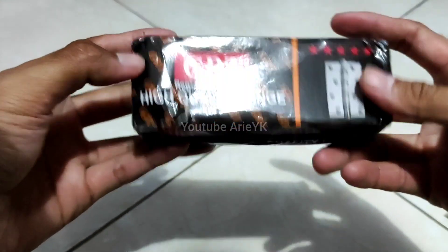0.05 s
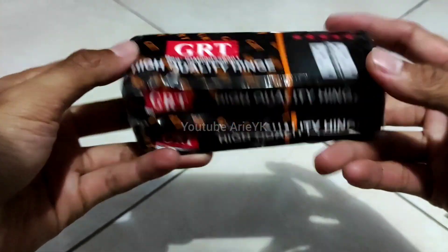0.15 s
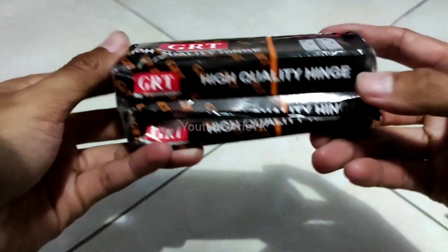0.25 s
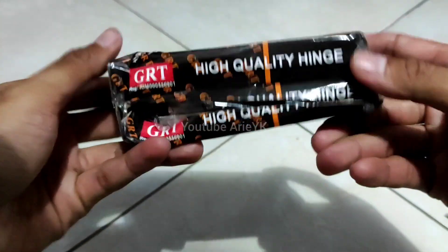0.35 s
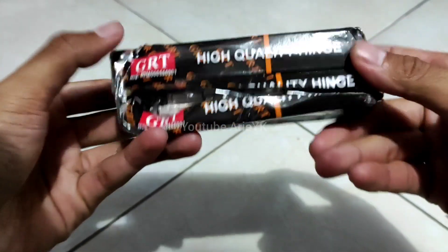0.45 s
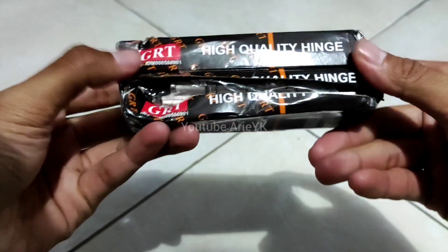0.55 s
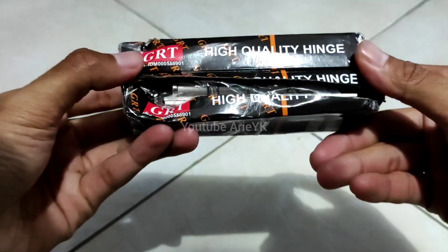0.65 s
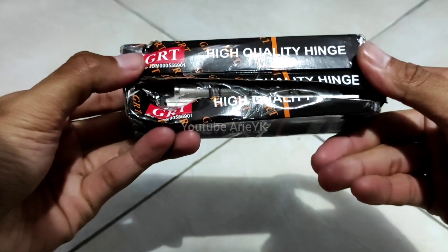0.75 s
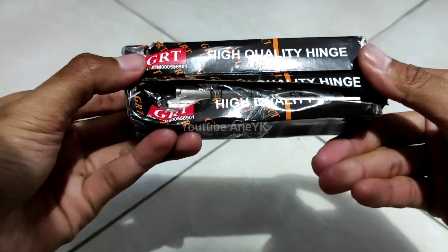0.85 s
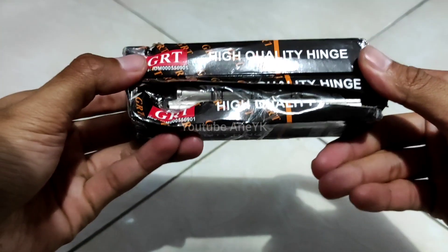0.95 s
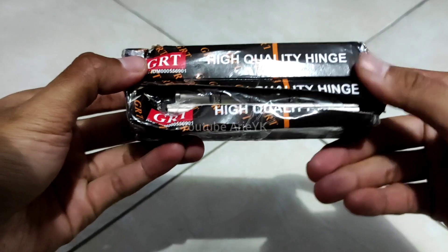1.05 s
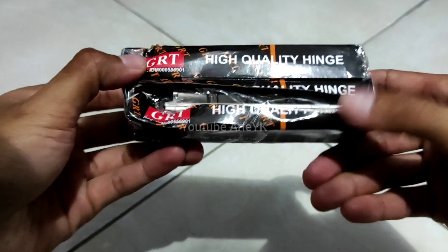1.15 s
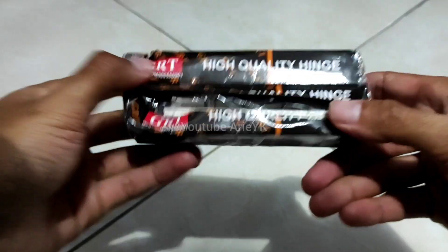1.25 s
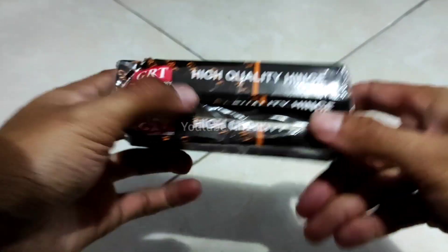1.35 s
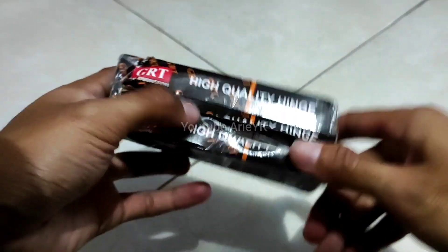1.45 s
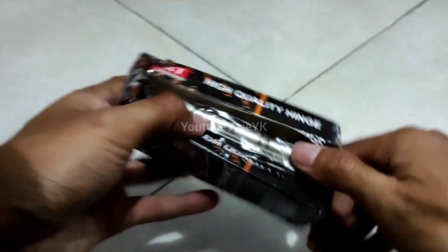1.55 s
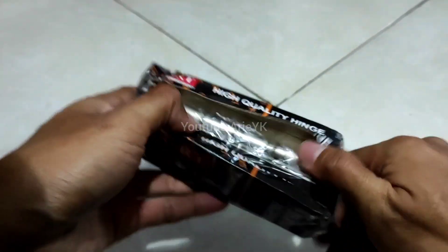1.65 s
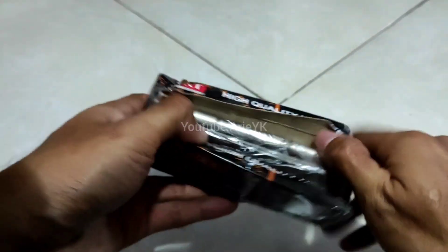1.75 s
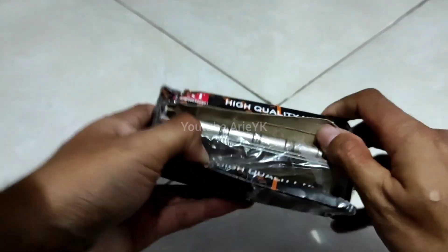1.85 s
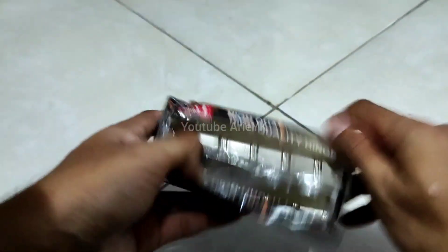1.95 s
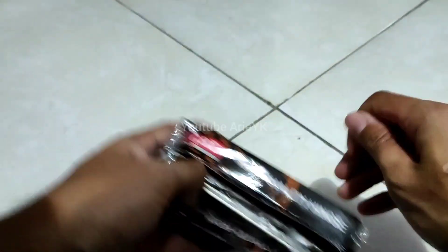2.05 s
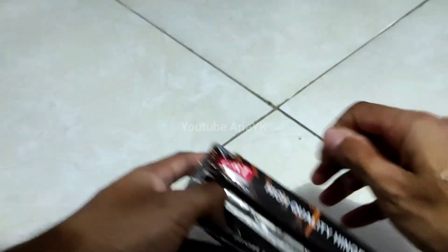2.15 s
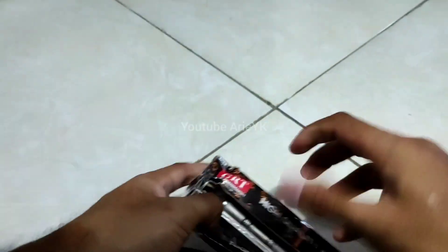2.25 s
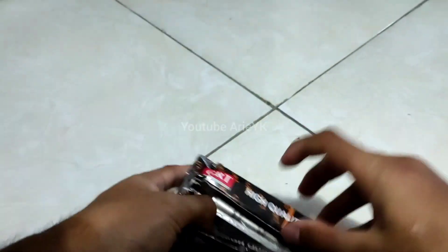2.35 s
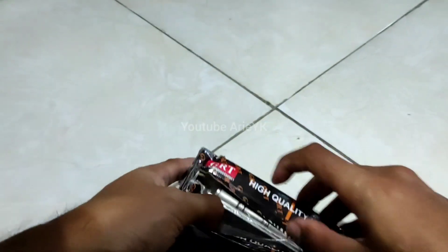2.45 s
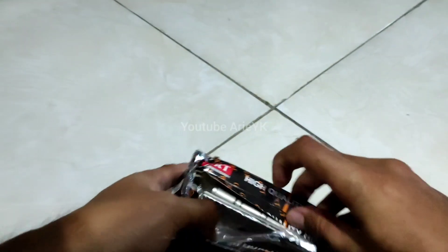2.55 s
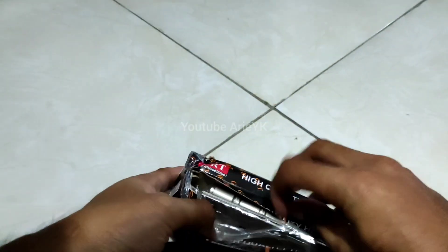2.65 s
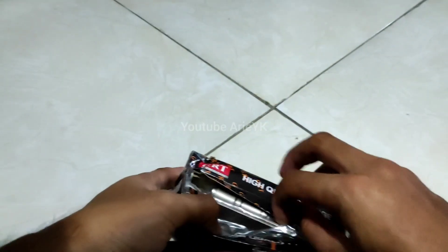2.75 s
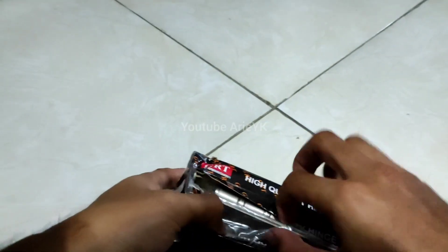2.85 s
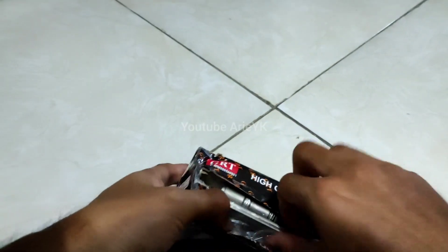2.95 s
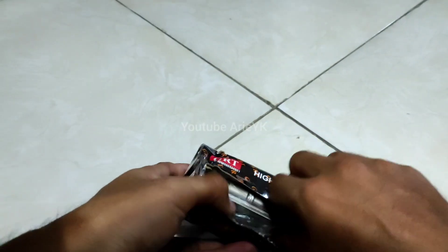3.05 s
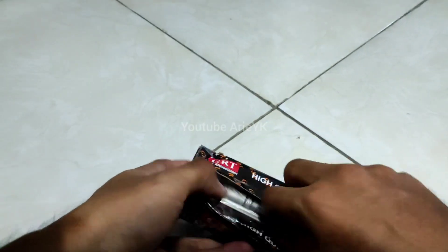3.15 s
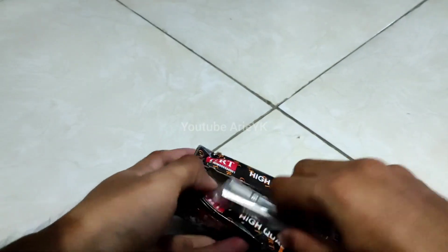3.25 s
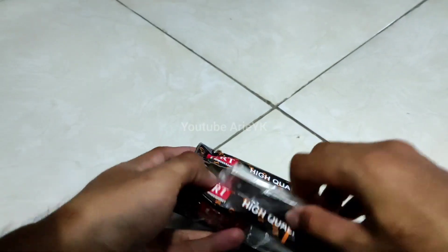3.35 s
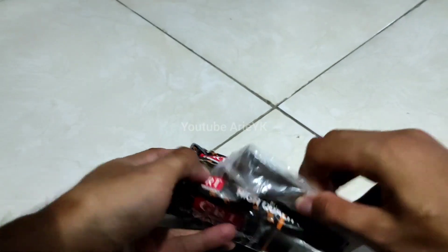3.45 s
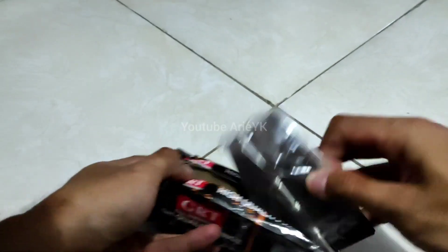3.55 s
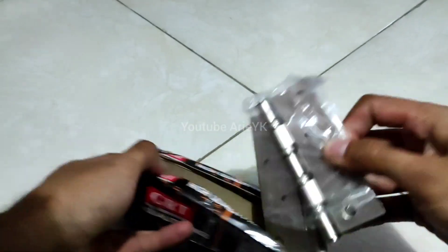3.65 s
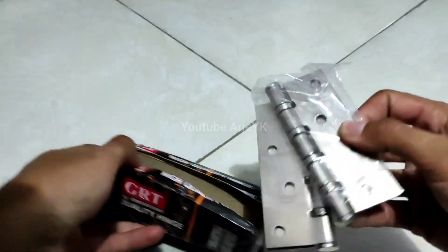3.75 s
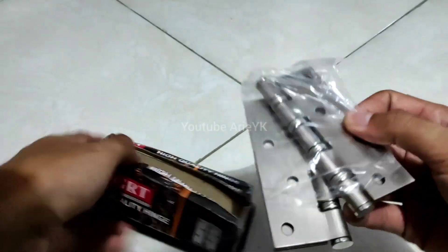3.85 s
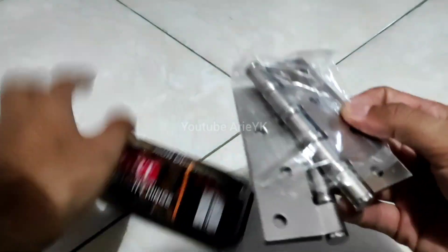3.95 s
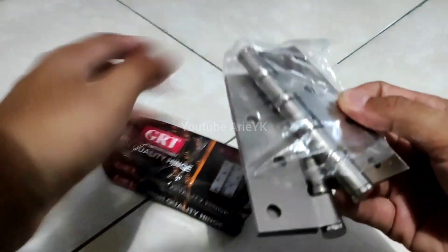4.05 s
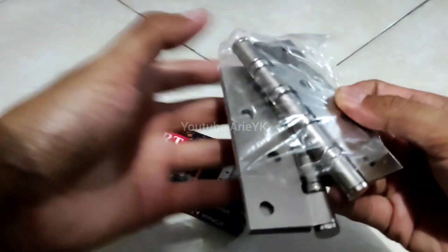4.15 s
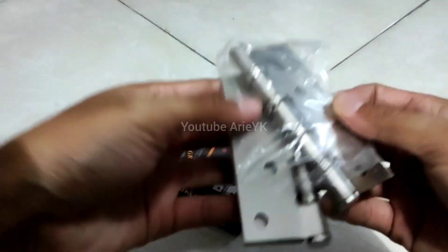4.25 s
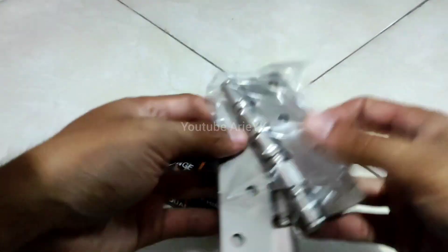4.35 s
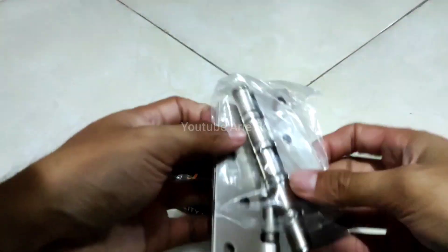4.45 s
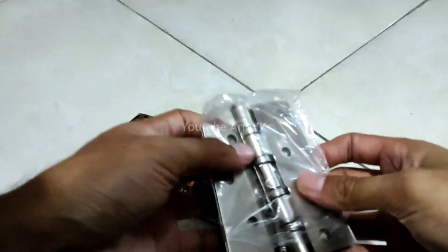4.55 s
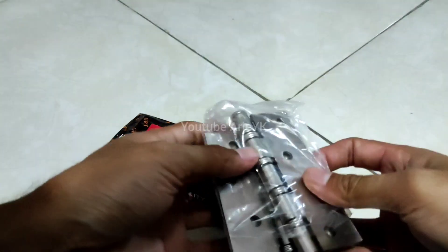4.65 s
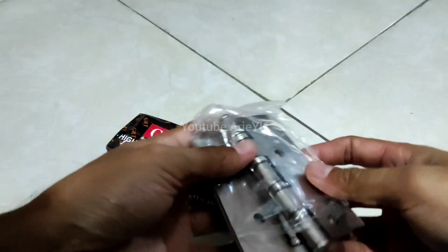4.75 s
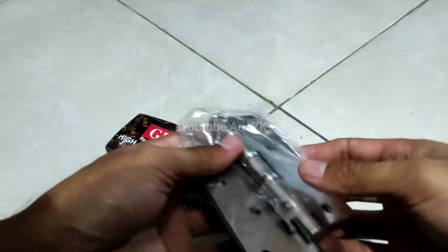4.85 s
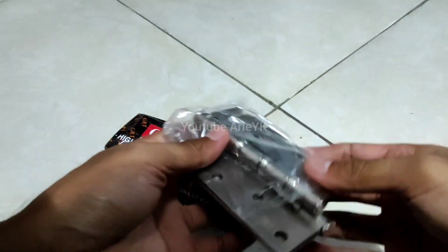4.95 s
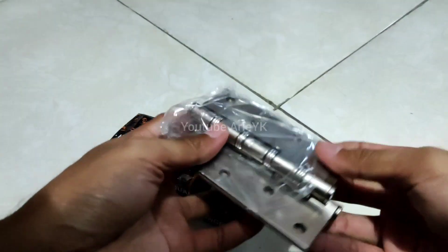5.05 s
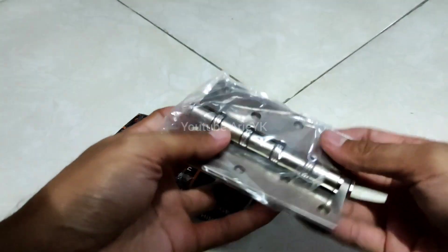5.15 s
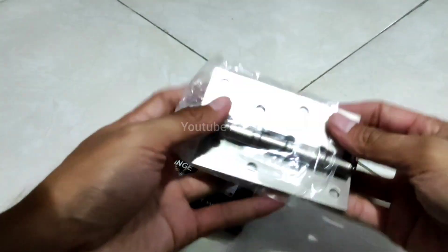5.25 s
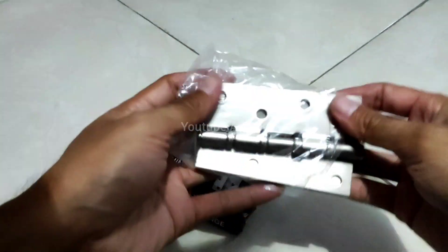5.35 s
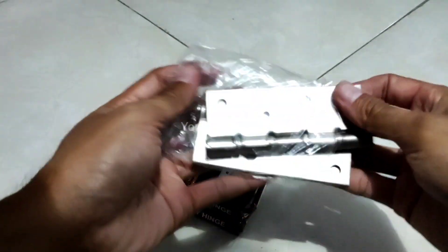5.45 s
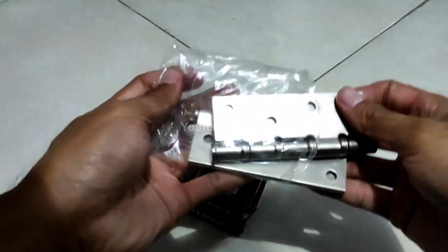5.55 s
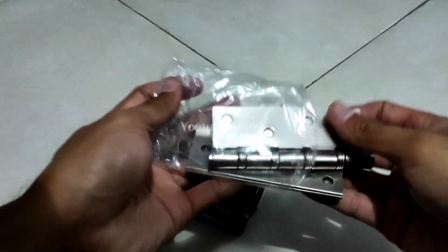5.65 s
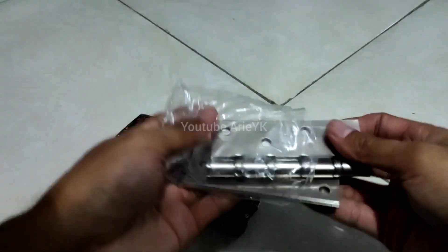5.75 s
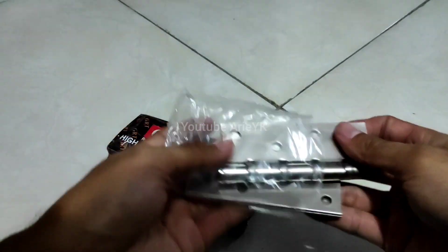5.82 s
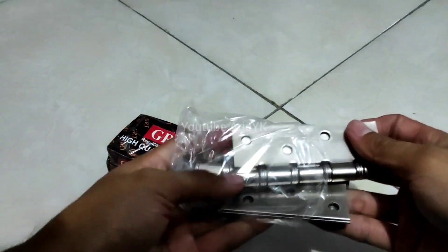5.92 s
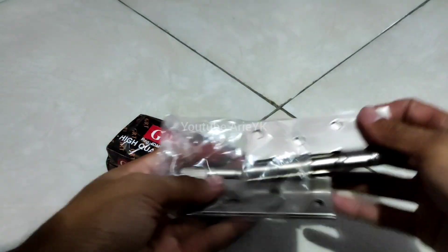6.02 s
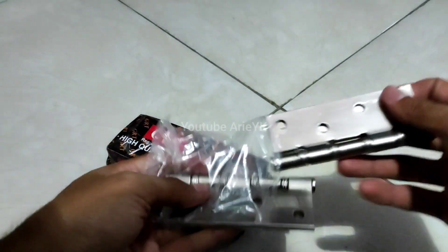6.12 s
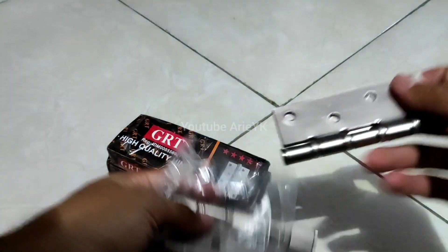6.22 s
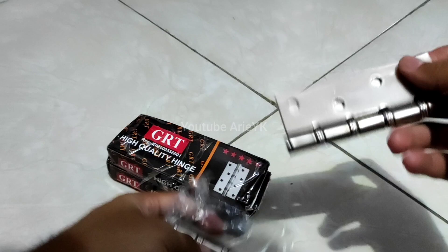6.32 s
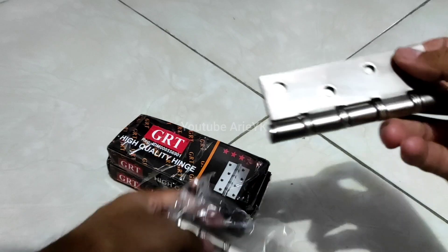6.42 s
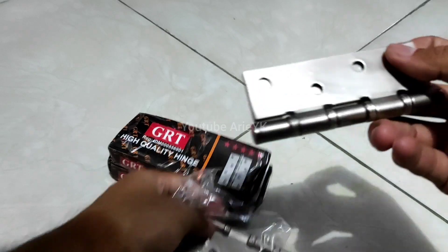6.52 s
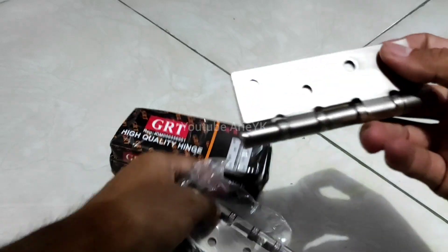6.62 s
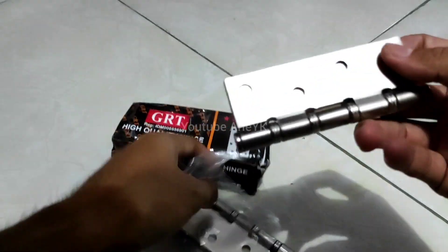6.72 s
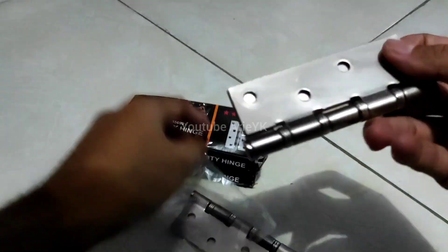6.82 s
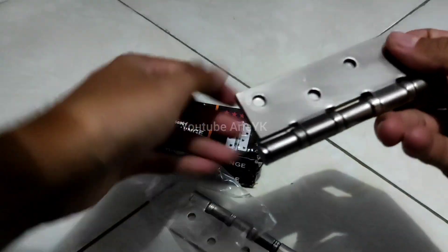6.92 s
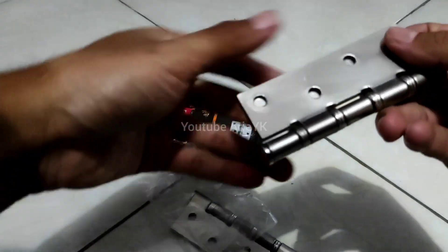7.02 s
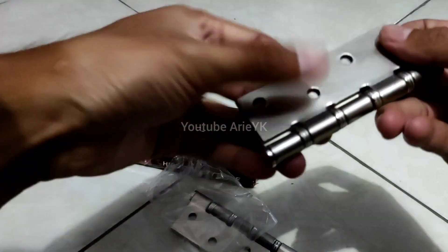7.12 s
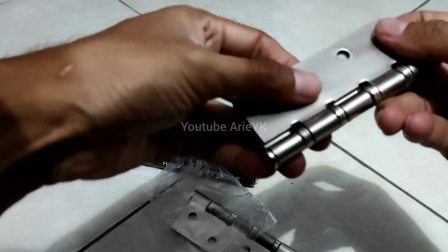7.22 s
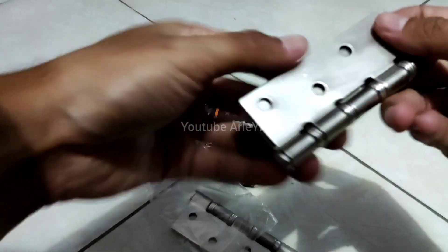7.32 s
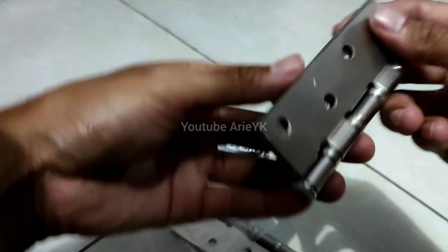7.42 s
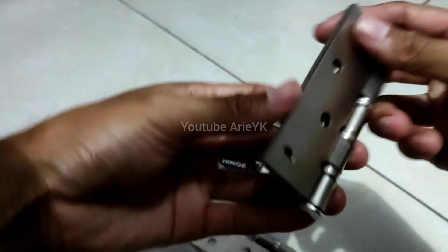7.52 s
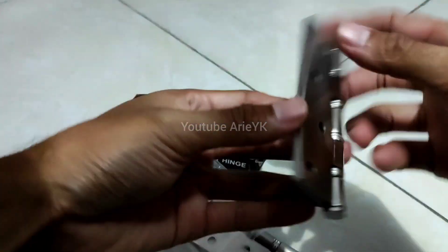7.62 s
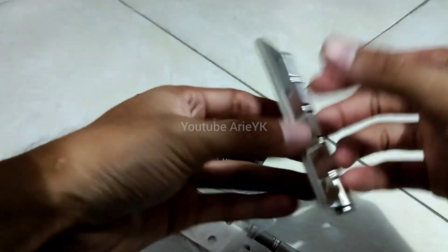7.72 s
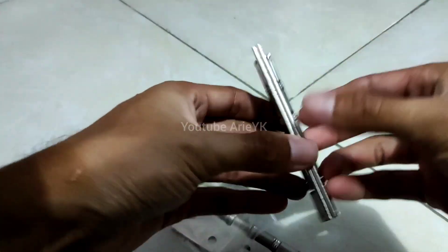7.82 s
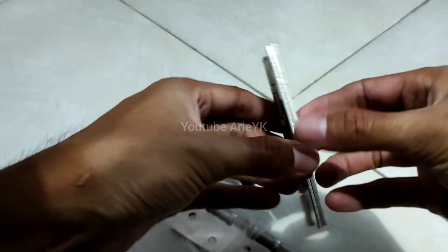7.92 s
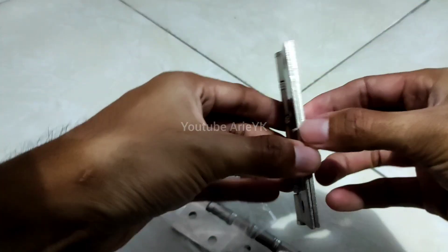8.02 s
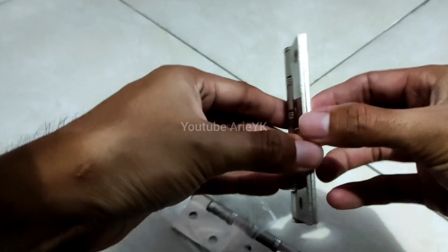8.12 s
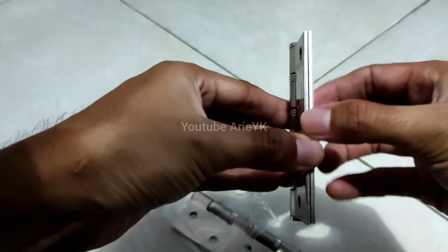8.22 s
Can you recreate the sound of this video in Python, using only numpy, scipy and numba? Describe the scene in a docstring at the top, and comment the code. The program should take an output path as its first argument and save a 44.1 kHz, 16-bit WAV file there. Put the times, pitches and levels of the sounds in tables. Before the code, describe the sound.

Close to a phone microphone in a small tiled room, hands work stiff plastic film. A few light clicks and rustles come first, then dense bright crackling with sharp snaps and dull box knocks, loudest past the middle. The film is put down and the crackle stops; soft finger sliding remains, with three brief, thin, high metallic rings from a turning hinge. Faint low hum, hiss and a steady high insect drone lie underneath.

```python
"""In a small tiled room, hands unwrap a steel hinge from crisp plastic film close to a phone.
Creases snap and rustle as shaped noise bursts; fingers swish and slide as grainy noise; dull knocks and thin
gliding squeaks sit among them, then three turns of the hinge ring as wavering sine modes.
Outside, filtered noise makes hum, hiss and an insect drone, and gliding tones make far engines.
The two microphone ports colour the film differently: the right one resonates near 6 kHz."""
import sys
import numpy as np
from scipy import signal
from scipy.fft import rfft, irfft, next_fast_len
from scipy.io import wavfile
from scipy.ndimage import uniform_filter1d
from numba import njit

SR = 44100
rng = np.random.default_rng(int(sys.argv[2]) if len(sys.argv) > 2 else 0)


def wav_record(signal):
    """Record a signal, one row per channel, as 16-bit PCM in the file named by sys.argv[1]."""
    frames = np.transpose(np.atleast_2d(signal))
    bounded = np.clip(frames, -1, 1)
    # unit amplitude maps onto the largest positive 16-bit level
    quanta = np.round(bounded * 32767).astype(np.int16)
    wavfile.write(sys.argv[1], SR, quanta)


N = 365059

# Levels in the tables are relative: each source is balanced again where it is played.
# Outdoor hum and hiss spectrum: f/Hz, left level/dB per Hz, right level/dB per Hz, likeness of the sides (0-1)
OUTDOOR_SPECTRUM = [(25, -85, -90.5, 0.6), (70, -83.5, -88.5, 0.3), (118, -87.5, -90, 0.6),
                    (167, -82, -88.5, 1), (265, -89.5, -98.5, 0.8), (332, -93.5, -95, 0.12),
                    (530, -101, -104, 0.9), (660, -101, -104, 0.4), (1030, -112, -113, 0.3),
                    (2000, -114, -114, 0.05), (3500, -113, -113, 0), (6000, -120, -103, 0.4),
                    (7840, -117, -115, 0), (12800, -130, -128, 0), (15000, -150, -150, 0.06)]
# Wavering low tones: f/Hz, width/Hz, level/dB
HUM_TONES = [(75.3, 8.9, -73), (168.6, 22.7, -69), (239, 66, -69.5)]
# Swell of the low hum: t/s, level/dB
TRAFFIC_SWELL = [(0, 2), (1, 2.5), (2.3, 6), (3.2, -1), (4.5, 3), (5.5, 3), (6.5, 3.5), (7.4, -1),
                 (7.7, -7.5), (8.28, -8)]
# Far engines: start t/s, end t/s, start f/Hz, end f/Hz, level/dB
ENGINE_GLIDES = [(0, 1.5, 201, 197, -73), (1.5, 2.8, 162, 166, -68), (4.0, 5.9, 137, 133, -74),
                 (4.25, 4.7, 170, 180, -68), (4.7, 6.0, 243, 240, -74), (5.9, 6.8, 249, 248, -68),
                 (6.9, 7.2, 195, 197, -69), (7.2, 7.5, 167, 166, -70), (7.95, 8.1, 357, 360, -75)]
# Swell of the insect drone: t/s, level/dB
INSECT_DRONE_SWELL = [(0, 0), (.9, 0), (1.3, -3), (2, 0), (7, -3), (7.35, -3), (7.5, 1), (7.9, -1.5),
                      (8.28, 1)]
# How hard the hands work the film: t/s, effort level/dB, breadth/dB (mids against that level)
HAND_EFFORT = [(0, -68, -0.5), (.1, -71.5, -0.5), (.44, -48.5, -11), (.87, -64, -15.5), (1.01, -43, -21.5),
               (1.2, -57, -11.5), (1.23, -62, -5), (1.27, -62, 0), (1.31, -62, 1), (1.36, -59, 0.5),
               (1.42, -63.5, 1.5), (1.46, -58.5, 1.5), (1.5, -60, 1.5), (1.6, -49, 1.5), (1.92, -53.5, 1),
               (2.04, -34.5, -4.5), (2.17, -55, 1), (2.27, -74.5, 12), (2.33, -71, 11), (2.36, -55, -0.5),
               (2.53, -52, -3.5), (2.65, -43, -1.5), (2.72, -55, -8), (2.86, -59, 3.5), (2.9, -52.5, 4.5),
               (2.94, -54, -7.5), (3.02, -49.5, 0.5), (3.16, -54.5, 0), (3.27, -39, -3), (3.6, -37.5, -5),
               (3.74, -47, -1.5), (3.92, -63.5, 6), (3.97, -35, -6), (4.02, -47.5, -9), (4.07, -54.5, 2),
               (4.1, -47, 10.5), (4.21, -47.5, -12.5), (4.35, -44, 1.5), (4.49, -47.5, 1),
               (4.61, -32.5, -6.5), (4.68, -55.5, -1), (4.73, -39, -11), (4.78, -50.5, -11.5),
               (4.85, -37, -3), (5.0, -39, -16), (5.07, -44.5, -1.5), (5.13, -51, -8), (5.22, -43.5, -5.5),
               (5.5, -29.5, -10.5), (5.64, -50, 2.5), (5.69, -59.5, -1.5), (5.71, -46, 0.5),
               (5.78, -47, -3.5), (5.95, -37.5, -7.5), (6.23, -34, -7.5), (6.28, -50, -5.5),
               (6.35, -70, 9.5), (6.41, -29, -15.5), (6.5, -46.5, -2.5), (6.66, -56.5, 1), (6.8, -46, 2.5),
               (6.93, -51.5, 0.5), (7.03, -57.5, -18.5), (7.18, -57, -16.5), (7.24, -50.5, -19),
               (7.38, -50, -14.5), (7.64, -68, -17.5), (7.7, -50, -12), (7.86, -49.5, -15.5),
               (8.12, -73.5, -9.5), (8.23, -89.5, -2), (8.28, -58, 9.5)]
# Loud creases: t/s, crack level/dB, film level/dB, film f/Hz, thud level/dB, left minus right/dB, basic fade/ms
LOUD_SNAPS = [(0.2012, -53, -55.5, 1320, -63, -6, 6), (0.3494, -43, -49.5, 1190, -48, -5, 4.7),
              (0.4284, -51, -69, 4500, -54, -6, 1.8), (0.5, -40, -49.5, 4550, -56, -3, 5.4),
              (1.241, -58, -68.5, 2000, -60, -3, 15), (1.4142, -41, -67, 4440, -72, 9, 3),
              (1.4406, -45, -57, 1440, -72, -8, 4.3), (1.484, -41, -51, 1690, -60, -1, 6.9),
              (1.544, -33, -40, 2430, -34.5, -7, 3.1), (1.5938, -29, -49, 3300, -53, 2, 4.5),
              (1.7074, -53, -41, 2640, -77, 6, 2.9), (1.729, -36.5, -42.5, 2450, -70, -14.5, 4.8),
              (1.805, -60, -43, 1790, -60, -5, 11), (1.8246, -46, -37, 2540, -53, 6, 3.9),
              (1.8681, -31, -33, 2000, -37, -1, 3.9), (1.8965, -39, -37.5, 1600, -39.5, -5, 4.1),
              (1.914, -28.5, -43, 2500, -65, -3, 3), (1.966, -49, -38, 2670, -45, -4, 3.8),
              (1.981, -33, -42, 2400, -60, -6, 2.5), (1.9895, -16, -35.5, 2370, -47, 6.5, 3.8),
              (2.0422, -12.5, -27, 1440, -28.5, -3, 2.2), (2.0452, -19, -29, 2480, -31, 4, 1.5),
              (2.083, -19.5, -32, 1430, -43, -3, 4.5), (2.132, -58, -52, 1300, -39, -4, 1.9),
              (2.191, -46, -59, 3130, -41.5, -12, 3.5), (2.341, -54, -53, 1300, -35, -12, 4.7),
              (2.36, -27, -44, 3260, -52, -2, 11), (2.463, -38, -54, 2850, -56, -13, 3),
              (2.4733, -32, -53, 2920, -51, -10, 12.6), (2.513, -34, -40.5, 1720, -45.5, -7, 3.1),
              (2.571, -36, -37, 3350, -53, -2, 4.1), (2.5907, -47, -53, 3290, -51, -5, 3.8),
              (2.6223, -33, -42, 2000, -69, -7, 10), (2.6392, -41, -42, 2100, -66, -6, 3),
              (2.646, -32, -38, 1900, -69, -3, 3.4), (2.6674, -31, -39, 3250, -76, -7, 5.8),
              (2.695, -39, -41, 1610, -72, -3, 4.7), (2.7569, -37.5, -48.5, 2140, -61, -6, 10),
              (2.7769, -51, -45, 3080, -59, -6, 5), (2.816, -40.5, -45, 1490, -50, -4, 4),
              (2.8775, -38, -41, 3000, -52.5, -3, 8.2), (2.897, -35, -45, 2000, -57, -6, 3.3),
              (2.952, -27.5, -45, 1950, -54, -8, 6.9), (2.9994, -36, -53, 1630, -56, -7, 5.2),
              (3.017, -40, -44, 1500, -47, -6, 2.5), (3.036, -42, -52, 2500, -60, -6, 3),
              (3.078, -39, -51, 3330, -74, -7, 4.8), (3.1268, -38, -43, 1880, -57, -4, 8.7),
              (3.1763, -33, -48, 3020, -54, 2, 5), (3.21, -32.5, -43.5, 1830, -62, -3, 5.8),
              (3.2291, -38, -52, 3080, -54, -8, 6.3), (3.261, -25.5, -37.5, 1670, -56, -4, 8.5),
              (3.4351, -41, -67, 2900, -70, -12.5, 3.3), (3.467, -32, -55, 3000, -65, -6, 2),
              (3.477, -31, -31.5, 3000, -37, -12, 2.3), (3.516, -27, -51, 2870, -50, -7, 15),
              (3.535, -37, -46, 3000, -60, -6, 2.8), (3.595, -30, -40.5, 3000, -47, -6, 6.4),
              (3.656, -20, -33.5, 3300, -44.5, -1, 4.9), (3.704, -14.5, -35, 4000, -54, -5.5, 6.4),
              (3.7901, -33, -32, 1880, -39, 0, 4.6), (3.8881, -62, -55, 2850, -52, 3, 16),
              (3.9551, -53, -42, 1480, -36.5, 13, 9.1), (3.9663, -44, -33.5, 3080, -42, -4, 3.9),
              (4.035, -26.5, -41.5, 2560, -62, -4, 6.1), (4.0884, -18, -29, 1350, -25, -1, 3.8),
              (4.137, -24, -31.5, 1610, -39, 2, 4.6), (4.229, -44, -55, 2740, -93, -6, 6.9),
              (4.25, -32, -47, 2560, -70, -2, 16), (4.273, -26, -38, 3580, -49, 1, 5.1),
              (4.3116, -29, -35, 3970, -46, -5, 4.7), (4.3768, -4, -34.5, 3660, -45.5, 3, 6.7),
              (4.382, -14, -35, 2960, -59, -3, 3.4), (4.426, -17, -48, 4010, -68, -3, 5.1),
              (4.518, -7, -29, 4180, -44, -3.5, 6.2), (4.6813, -31, -50.5, 3210, -50.5, 0, 4.4),
              (4.715, -37, -45.5, 3150, -47, -1, 8.2), (4.784, -30.5, -57, 2620, -60, -5, 5.8),
              (4.8369, -28, -41, 2740, -45, -4, 6.2), (4.8526, -20, -33.5, 2600, -41, 7, 2.8),
              (4.893, -25, -44.5, 2770, -46.5, 0, 7.5), (4.9466, -31, -50, 4500, -60, -3, 5.5),
              (5.011, -43, -59, 2890, -52, -6, 4.2), (5.034, -39, -57, 4470, -56, -7, 4.1),
              (5.054, -29, -60, 2580, -54, 1, 8.1), (5.069, -31, -50, 1500, -48, -9, 3),
              (5.108, -29.5, -41, 3680, -61, -6, 5.9), (5.138, -28, -41.5, 3650, -53.5, 1, 4.3),
              (5.1812, -30.5, -51, 2750, -60, -4, 7.4), (5.2058, -26, -40, 4050, -67, 1, 17),
              (5.229, -21.5, -50, 2650, -70, 3, 6.9), (5.283, -31, -47, 3340, -55, -5, 10),
              (5.3186, -27, -50, 3290, -62, -3, 14), (5.369, -22, -43, 3340, -46, 5, 5.4),
              (5.4237, -17, -49, 4130, -71, -1, 6.6), (5.453, -23, -47, 3000, -51, -5, 3.7),
              (5.505, -16, -39, 2980, -45, 9, 4), (5.518, -32, -40, 2900, -43, 1, 4),
              (5.5425, -19, -38, 3210, -57, 3, 3.4), (5.574, -24, -48, 3000, -58, -5, 2.7),
              (5.7017, -33, -52, 3300, -55, -1, 5.4), (5.7438, -27, -46, 2510, -61, 1, 7),
              (5.8496, -35, -45, 3220, -53.5, -1, 11), (5.874, -22, -40.5, 2960, -59, -4, 3.7),
              (5.8916, -21.5, -49, 2500, -66, -1, 4.7), (5.9333, -25, -38.5, 3700, -49, -6, 7.7),
              (6.017, -25, -37, 3040, -48.5, 0, 13), (6.039, -9, -24.5, 6100, -50, -5.5, 2.7),
              (6.08, -19, -33, 6360, -54, -8, 5.2), (6.0907, -22, -49, 4500, -66, -6, 3.4),
              (6.0932, -10, -36, 3360, -66, -8, 3.7), (6.1038, -28, -50, 3500, -66, -7, 2.5),
              (6.108, -24, -52, 3500, -66, -9, 3), (6.171, -44, -50, 2290, -46, -8, 3.2),
              (6.2052, -40, -50, 2250, -41, -10, 3), (6.3923, 2.5, -19, 3900, -34.5, -3, 3.9),
              (6.4307, -5, -34.5, 3500, -44, -6, 7.9), (6.527, -35, -42.5, 3300, -54, -5, 16),
              (6.559, -31, -42.5, 4180, -65, -5, 5.4), (6.5874, -28.5, -71, 1690, -76, -3, 6.5),
              (6.634, -35.5, -41.5, 3600, -63, -7, 4.2), (6.673, -35, -60, 1810, -63, -2.5, 3.8),
              (6.6943, -17, -40, 2980, -51.5, -4, 4.8), (6.797, -37, -54, 2880, -54, -12, 4.5),
              (6.825, -16, -25.5, 2830, -38.5, -2.5, 5), (6.8757, -10, -25.5, 4080, -47.5, -1, 9.5),
              (7.401, -59, -65, 2400, -69, -14, 5.4), (7.541, -41.5, -60.5, 2300, -83.5, -12, 4.3),
              (7.678, -48, -61, 6400, -79, -12, 3), (8.258, -64, -61, 4480, -54.5, -12, 11)]
# Colours of skin sliding on film: f/Hz, width/Hz
SLIDE_COLOURS = [(1350, 900), (2300, 1000), (3200, 800), (4150, 1100)]
# Microphone port responses: f/Hz, left level/dB, right level/dB
PORT_RESPONSE = [(154, 8, 5.5), (444, 6, 3), (487, 0.5, -8.5), (680, 4.5, 2.5), (1440, 0.5, -2),
                 (3260, 5.5, 1.5), (3320, 4.5, 1), (3920, -2, -1.5), (4600, 2.5, 3), (5030, -1.5, 6.5),
                 (5120, 0.5, 7.5), (5714, -10, 11), (6130, 1.5, 18), (7130, -1, 9), (8550, 4, 3),
                 (9200, -2.5, -2), (9900, -6.5, -7), (12400, -9, -1.5), (13560, -24, -5.5),
                 (15900, -67.5, -28)]
# Dull knocks of box and fingers: t/s, level/dB, f/Hz, fade/ms
BOX_KNOCKS = [(0.651, -49.5, 870, 5.4), (1.148, -42, 905, 3.3), (1.262, -45, 850, 5.5),
              (1.275, -49, 800, 4), (1.34, -45.5, 1250, 11), (1.375, -47, 1290, 7.6),
              (1.457, -42, 1290, 10), (1.501, -49, 1200, 5), (1.546, -31.5, 600, 1.7),
              (2.045, -29.5, 320, 3.1), (2.135, -26, 660, 2.8), (3.317, -37, 264, 13),
              (3.52, -45.5, 205, 11), (3.789, -39, 244, 22), (3.957, -29.5, 261, 5),
              (3.973, -37.5, 185, 5.7), (4.086, -33.5, 417, 7), (4.608, -35, 670, 16),
              (6.029, -41.5, 656, 5.4), (6.225, -31, 955, 6.7), (6.396, -33, 393, 8.5),
              (6.635, -53, 740, 5.4), (6.946, -46, 1690, 3.4), (7.39, -58, 1417, 9.6),
              (7.853, -51, 589, 11)]
# Squeaks of rubbed film and card: start t/s, end t/s, f/Hz at start, middle and end, level/dB
RUB_SQUEAKS = [(1.25, 1.285, 1550, 1150, 750, -74), (3.9, 3.945, 620, 740, 870, -62),
               (5.94, 6.06, 320, 325, 280, -63), (6.28, 6.338, 590, 610, 630, -71),
               (6.283, 6.328, 765, 775, 780, -73), (6.338, 6.364, 790, 800, 800, -74),
               (6.342, 6.384, 680, 675, 670, -63), (6.6, 6.74, 300, 315, 330, -67),
               (6.94, 7.02, 2250, 2450, 2500, -80), (6.95, 7.13, 4800, 5090, 4800, -79)]
# Turns of the hinge: start t/s, hold/s, level/dB
HINGE_TURNS = [(7.663, 0.063, -60), (7.803, 0.031, -59.5), (7.876, 0.016, -66)]
# Steel modes: f/Hz, level/dB in the first, second and third turn, 60 dB decay/s
HINGE_MODES = [(2299, -26, -34, -34, .08), (3655, -30, -26, -30, .12), (4909, -16, -17, -14, .8),
               (5196, -22, -16, -14, .25), (5640, -19, -24, -24, .15), (5890, -15, -22, -26, .12),
               (5990, 2, -22, -10, .3), (6043, -18, -1, -5, .55), (6185, -17, 1, -9, .45),
               (6255, -17, -12, -24, .12), (6398, -13, -22, -22, .2), (7180, -14, -22, -26, .12),
               (7300, -13, -20, -26, .15), (7772, -16, -26, -28, .12), (7966, -24, -22, -19, .55),
               (8458, -22, -18, -20, .4), (9109, -28, -25, -26, .3), (9631, -27, -28, -28, .25),
               (10610, -30, -28, -30, .15), (11110, -29, -30, -30, .15), (12370, -27, -23, -25, .25),
               (13510, -32, -27, -29, .25), (14100, -34, -29, -31, .15)]

INSECT_HZ, INSECT_WIDTH_HZ, INSECT_DB = 4380, 270, -71.5  # level before the left/right balance
CREASES_PER_S, FILM_DOWN_S = 260, 6.97  # small creases stop when the film is put down
THUD_LO_HZ, THUD_RANGE = 670, 1.33  # loud thuds lie between lo and lo x range
THUD_UNDER_FILM_DB = -5.5
TREBLE_DB, TREBLE_PER_BREADTH, TREBLE_PER_DB = 6.5, 0.88, 0.01  # broad or hard rustle is brighter
FLURRY_DB, FLURRY_FADE_S = -14.5, 0.031  # more fine rustle just after each loud crease
STRAIN_DB, STRAIN_S = 1, 0.02  # the rustle swells slightly just before a snap
SNAP_CRACK_HZ = 8400  # loud cracks scatter around this colour
SNAP_RISE_MS = (1, 3.6, 1.3)  # crack, film, thud, before the scatter below
RISE_SPREAD = 0.68  # rises scatter between this factor and its inverse
BUCKLE_DB, BUCKLE_MS = (5, 4), .8  # first hard give against later crackle (crack, film), and its length
GRAIN_DB, SHADE_DB = 2.5, 3  # grain depth of swish and slide; wander of each slide colour
ROOM_T60_S, ROOM_DB = 0.16, (-14, -6)  # left, right; the right port faces the walls
TURN_RISE_S, TURN_FADE_S = 0.0093, 0.005
GRIP_DAMP_DB, CHATTER_DB = 3.5, 1.5  # shifting fingers damp each mode; the leaves rattle on the pin
WAVER = .0032  # scale of each mode's pitch wander, as a share of its pitch
TOP_HZ = 16300


def undb(db):
    """Decibels to amplitude."""
    return 10 ** (np.asarray(db) / 20)


def level(x, db):
    """Set the RMS level of a sound."""
    return x * undb(db) / np.sqrt(np.mean(x ** 2))


def curve(rows):
    """Automation lanes: the columns after time, one value per sample."""
    s, *columns = np.transpose(rows)
    return [np.interp(np.arange(N) / SR, s, column) for column in columns]


def walk(rate):
    """Random levels held 1 / rate s and slewed twice; spread near 1."""
    hold = int(SR / rate)
    steps = np.repeat(rng.standard_normal(N // hold + 1), hold)
    return 1.3 * uniform_filter1d(uniform_filter1d(steps, hold), hold)[:N]


def glide(hz):
    """Phase of a tone whose pitch moves sample by sample."""
    return 2 * np.pi * np.cumsum(hz) / SR


def band_noise(hz, width_hz):
    """Noise in one steep band."""
    sos = signal.butter(2, [hz - width_hz / 2, hz + width_hz / 2], "band", fs=SR, output="sos")
    return signal.sosfilt(sos, rng.standard_normal(N))


def outdoors():
    """Far sound through the ports: broad hiss, low hum and engines stronger left, insects stronger right."""
    hum = traffic_hum() + engines()
    return hiss() * undb(0.66 * walk(4.1)) + hum * undb([[2.5], [-2.5]]) + insects()


def hiss():
    """Two noises shaped by the outdoor spectrum and partly shared, so the sides match more at some pitches."""
    size = next_fast_len(N)
    log_hz = np.log(np.maximum(np.fft.rfftfreq(size, 1 / SR), 1))
    table = np.array(OUTDOOR_SPECTRUM)
    left_db, right_db, alike = (np.interp(log_hz, np.log(table[:, 0]), table[:, k]) for k in (1, 2, 3))
    alike = np.clip(alike, 0, 1)
    first, second = rfft(rng.standard_normal((2, size))) * np.sqrt(SR / 2)  # unit power per Hz
    right = alike * first + np.sqrt(1 - alike ** 2) * second
    return irfft([first * undb(left_db), right * undb(right_db)], size)[:, :N]


def traffic_hum():
    """Low narrow noise bands waver in level and swell together."""
    hum = sum(level(band_noise(hz, width), db) * undb(2.4 * walk(2.0)) for hz, width, db in HUM_TONES)
    return hum * undb(curve(TRAFFIC_SWELL)[0])


def engines():
    """Slowly gliding tones fade in and out over 21 ms and waver in pitch and level."""
    out, t = 0, np.arange(N) / SR
    for t0, t1, hz0, hz1, db in ENGINE_GLIDES:
        hz = np.interp(t, [t0, t1], [hz0, hz1]) + 0.92 * walk(11)
        fade = np.clip(np.minimum(t - t0, t1 - t) / 0.021, 0, 1)
        out = out + np.sqrt(2) * undb(db + 2.5 * walk(9)) * fade * np.sin(glide(hz))
    return out


def insects():
    """A narrow noise band drones separately at each port under a shared swell."""
    swell = undb(1.6 * walk(8) + curve(INSECT_DRONE_SWELL)[0])
    sides = [level(band_noise(INSECT_HZ, INSECT_WIDTH_HZ), INSECT_DB + db) for db in (-8, 5)]
    return np.array(sides) * swell


@njit
def bursts(start, size, rise, fade, hz, sharp, noise):
    """Noise bursts that rise and fade, each through its own band-pass of width hz / sharp, power kept."""
    out = np.zeros(len(noise))
    for n in range(len(start)):
        g, damping = np.tan(np.pi * hz[n] / SR), 1 / sharp[n]
        band, low = 0., 0.  # filter memories
        unrisen = 1.
        gain = size[n] * np.sqrt(SR * sharp[n] / (np.pi * hz[n]))
        fall = np.exp(-1 / fade[n])
        stop = start[n] + int(6 * fade[n] + 4 * sharp[n] * SR / hz[n])
        for i in range(start[n], min(len(noise), stop)):
            unrisen *= 1 - 1 / rise[n]
            v = (band + g * (gain * (1 - unrisen) * noise[i] - low)) / (1 + g * (g + damping))
            band = 2 * v - band
            low += 2 * g * v
            gain *= fall
            out[i] += damping * v
    return out


def creases(start, size, rise, fade, hz, sharp, noise, tick_db, give=0.99):
    """A sudden buckle: a brief hard give (in samples) with a burst of finer crackle."""
    one = np.ones(len(start))
    tick_size = size * np.sqrt(np.minimum(fade, 130) / give) * undb(tick_db)
    tick = bursts(start, tick_size, give * one, give * one, hz, sharp * one, noise[::-1].copy())
    return tick + bursts(start, size, rise * one, fade, hz, sharp * one, noise)


def handling():
    """Hand effort sets crack, film, thud and treble levels, with a swell before and a flurry after each snap."""
    effort_db, breadth_db = curve(HAND_EFFORT)
    s, crack_db, film_db, _, thud_db, *_ = np.transpose(LOUD_SNAPS)
    at = (s * SR).astype(int)
    flurry = np.zeros((3, N))  # power
    flurry[:, at] = undb(np.array([crack_db, film_db, thud_db]) + FLURRY_DB) ** 2
    flurry = signal.lfilter([1], [1, -np.exp(-2 / (FLURRY_FADE_S * SR))], flurry)
    mark = np.zeros(N)
    mark[at] = 1
    # run backwards in time, so the swell leads up to each snap
    strain = signal.lfilter([1], [1, -np.exp(-1 / (STRAIN_S * SR))], mark[::-1])[::-1]
    offsets_db = np.array([0 * breadth_db, breadth_db, breadth_db + THUD_UNDER_FILM_DB])
    steady_db = effort_db + STRAIN_DB * np.minimum(strain, 1) + offsets_db
    treble_db = TREBLE_DB + TREBLE_PER_BREADTH * breadth_db + TREBLE_PER_DB * effort_db
    return (*10 * np.log10(undb(steady_db) ** 2 + flurry), treble_db)


def small_creases(scatter_db=3.5):
    """Many little folds give way at random moments, sizes, pitches and sides, as loud as the hands work."""
    u = rng.random((int(CREASES_PER_S * FILM_DOWN_S), 9)).T
    s = u[0] * FILM_DOWN_S
    size_db = np.minimum(-scatter_db * np.log(u[1]), 2.6 * scatter_db)
    crack, film_level, thud, _ = (lane[(s * SR).astype(int)] for lane in handling())
    crack_db = crack + size_db - 4.5 + 6 * u[2]
    film_db = film_level + size_db - 12.5 + 11 * u[3]
    thud_db = thud + size_db - 13.5 + 11 * u[5]
    film_hz, thud_hz = 1350 * 3.8 ** u[4], 320 * 5.5 ** u[6]
    fade_ms, pan_db = .35 + 2 * u[7] ** 2, -6 + 6 * (u[8] - .5)
    return np.array([s, crack_db, film_db, film_hz, thud_db, thud_hz, fade_ms, pan_db]).T


def loud_creases():
    """The big folds snap at set moments, each with a chance thud pitch."""
    s, crack_db, film_db, film_hz, thud_db, pan_db, fade_ms = np.transpose(LOUD_SNAPS)
    thud_hz = THUD_LO_HZ * THUD_RANGE ** rng.random(len(s))
    return np.array([s, crack_db, film_db, film_hz, thud_db, thud_hz, fade_ms, pan_db]).T


def finger_grip():
    """Skin catches and lets go: uneven gains for the swish and the slide, steadier once the film is down."""
    depth = np.where(np.arange(N) < FILM_DOWN_S * SR, 1, .5)
    grip = undb((1.9 * walk(90) + 0.97 * walk(25)) * depth)
    return [grip * level(undb(GRAIN_DB * walk(rate)), 0) for rate in (350, 200)]


def slide(shades):
    """Skin sliding on film: noise bands whose balance wanders."""
    bands = [band_noise(hz, width) * shade for (hz, width), shade in zip(SLIDE_COLOURS, shades)]
    return level(sum(bands), 0)


def port(side, lo_hz, hi_hz):
    """Minimum-phase response of one port; both ports together have RMS gain 1 between lo and hi."""
    f, table = np.maximum(np.fft.rfftfreq(1024, 1 / SR), 1), np.array(PORT_RESPONSE)
    db = [np.interp(np.log(f), np.log(table[:, 0]), table[:, k]) for k in (1, 2)]
    mean = np.sqrt(np.mean(undb(db)[:, (f > lo_hz) & (f < hi_hz)] ** 2))
    cepstrum = irfft(db[side] * np.log(10) / 20)
    cepstrum[1:512] *= 2  # fold the cepstrum to make the response causal
    cepstrum[513:] = 0
    return irfft(np.exp(rfft(cepstrum)))[:512] / mean


def film():
    """Each crease is a bright crack, a short film ring and a duller thud in the folded pack; fingers swish."""
    rows = np.vstack([loud_creases(), small_creases()])
    s, crack_db, film_db, film_hz, thud_db, thud_hz, fade_ms, pan_db = rows.T
    loud = len(LOUD_SNAPS)
    start, fade = (s * SR).astype(np.int64), np.clip(fade_ms, .3, 60) * SR / 1000
    u = rng.random((len(s), 3)).T
    rise = np.maximum(np.outer(SNAP_RISE_MS, RISE_SPREAD ** (2 * u[1] - 1)) * SR / 1000, 1)
    rise[:, loud:] = np.maximum(.4 * rise[:, loud:], 1)  # small folds give way faster
    crack_hz = 5500 * 3.5 ** u[0]  # each small crease has its own colour
    crack_hz[:loud] = SNAP_CRACK_HZ * 1.5 ** (u[0, :loud] - .5)
    give = BUCKLE_MS * SR / 1000

    swish_db, slide_db, _, lift_db = handling()
    swish_grip, slide_grip = finger_grip()
    shades = [undb(SHADE_DB * walk(18)) for _ in SLIDE_COLOURS]
    shared = rng.standard_normal(N)
    thud = bursts(start, undb(thud_db + 1.0), rise[2], 1.88 * fade, thud_hz,
                  0.15 + 2.0 * u[2], rng.standard_normal(N))
    high = signal.butter(4, 4500, "high", fs=SR, output="sos")
    treble = signal.butter(2, 7600, "high", fs=SR, output="sos")
    out = []
    for side in (0, 1):
        pan = undb((pan_db + 5.0) * (0.5 - side))  # a middle crease already favours the left port
        heard = fade * (.45, .62)[side]  # the left port faces the hands and hears the first instant best
        crack = creases(start, pan * undb(crack_db - 5.0), rise[0], heard, crack_hz, 0.66,
                        rng.standard_normal(N), BUCKLE_DB[0], give)
        crack = crack + swish_grip * undb(swish_db - 5.0) * rng.standard_normal(N)
        crack = crack + (undb(lift_db) - 1) * signal.sosfiltfilt(treble, crack)  # thin taut film is brighter
        ring = creases(start, pan * undb(film_db - 0.5), rise[1], heard, film_hz, 0.86 + 7.8 * u[2],
                       1.4 * shared + 1.2 * rng.standard_normal(N), BUCKLE_DB[1], give)
        ring = ring + slide(shades) * slide_grip * undb(slide_db - 5.5)
        bright = signal.oaconvolve(signal.sosfilt(high, crack), port(side, 5300, 13730))[:N]
        body = signal.oaconvolve(ring + thud, port(side, 360, 4300))[:N]
        out.append(bright + body)
    return np.array(out)


def room(x):
    """Dense decaying echoes off tiles and walls, different at each port, build up over 11 ms."""
    t = np.arange(int(.4 * SR)) / SR
    decay = np.exp(-np.log(1000) * t / ROOM_T60_S) * np.clip(t / 0.011, 0, 1)
    echo = rng.standard_normal((2, len(t))) * decay
    echo = echo / np.sqrt(np.sum(echo ** 2, axis=1, keepdims=True)) * undb(ROOM_DB)[:, None]
    return signal.oaconvolve(x, echo, axes=1)[:, :N]


def knocks():
    """The box and the hands thump on each other and on the floor: short resonant noise bursts."""
    s, db, hz, fade_ms = np.transpose(BOX_KNOCKS)
    scuff = (hz > 750) & (hz < 1500)  # fingertips on card scuff more than they ring
    fade = np.clip(fade_ms, 1, 60) * SR / 1000
    sharp, tick_db = np.where(scuff, 1.8, 4.4), np.where(scuff, -9, 0.5)
    thumps = creases((s * SR).astype(np.int64), undb(db - 9.0), 53.0, fade, hz, sharp,
                     rng.standard_normal(N), tick_db)
    return thumps * undb([[2], [-2.5]])


def squeaks():
    """Thin tones that swell, bend and die while something slides."""
    out, t = 0, np.arange(N) / SR
    for t0, t1, hz0, hz1, hz2, db in RUB_SQUEAKS:
        x = np.clip((t - t0) / (t1 - t0), 0, 1)
        bend = np.polyfit([0, .5, 1], [hz0, hz1, hz2], 2)
        hz = np.polyval(bend, x) + 10 * walk(120)
        swell = np.sqrt(2 * np.sin(np.pi * x) ** 2)
        out = out + swell * undb(db + 3 + 4 * walk(90)) * np.sin(glide(hz))
    return out * undb([[1.], [-1.]])


def hinge():
    """Each turn drives the steel's modes, which ring on; a new grip favours other modes."""
    t = np.arange(N) / SR
    push = []
    for start, hold, db in HINGE_TURNS:
        attack = np.clip((t - start) / TURN_RISE_S, 0, 1)
        release = np.exp(-np.maximum(t - start - TURN_RISE_S - hold, 0) / TURN_FADE_S)
        push.append(attack * release * undb(db))
    pressed, ring = np.minimum(sum(push) / np.max(push), 1), 0
    for hz, *turn_db, t60 in HINGE_MODES:
        fall = np.exp(-np.log(1000) / (t60 * SR))
        swings = [signal.lfilter([1], [1, -fall], p) for p in push]
        # each swing peaks as high as its push, then takes the mode's level for that turn
        swing = sum(undb(db) * s * p.max() / s.max() for db, s, p in zip(turn_db, swings, push))
        pitch = hz * (1 + WAVER * (0.336 + pressed) * walk(40))  # wanders more while pressed
        flutter = undb(GRIP_DAMP_DB * walk(35) + CHATTER_DB * walk(150))
        ring = ring + np.sqrt(2) * swing * flutter * np.sin(glide(pitch) + 2 * np.pi * rng.random())
    return ring * undb([[-8], [3.0]])


def scene():
    """Everything in the hands, with its room echo, over the outdoors."""
    near = film() + hinge() + knocks() + squeaks()
    return near + room(near) + outdoors()


def record(dry):
    """The phone rounds the loudest peaks and cuts the top."""
    rounded = .8 * np.tanh(dry / .8)
    return signal.sosfilt(signal.ellip(8, .2, 70, TOP_HZ, fs=SR, output="sos"), rounded)


dry = scene()
out = record(dry)
wav_record(out)
```